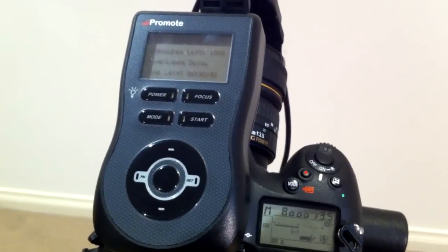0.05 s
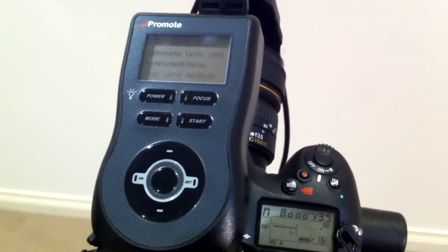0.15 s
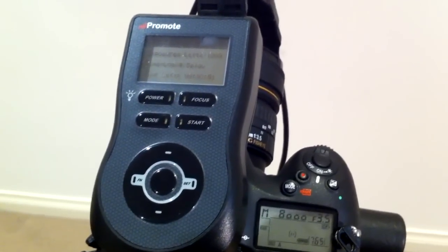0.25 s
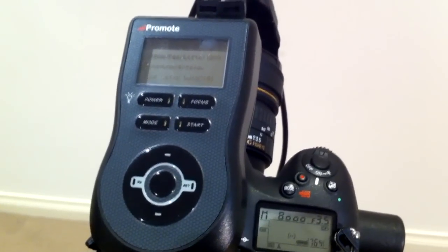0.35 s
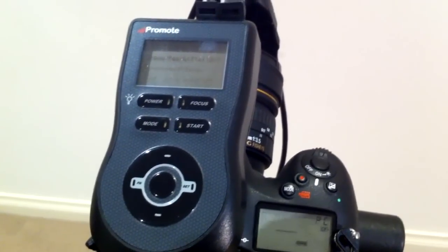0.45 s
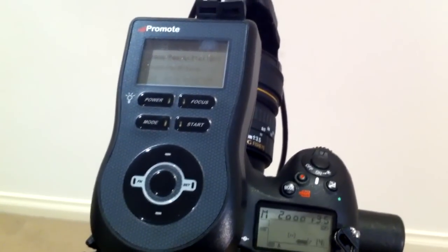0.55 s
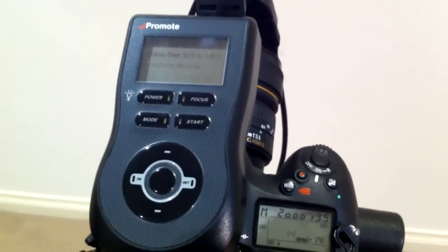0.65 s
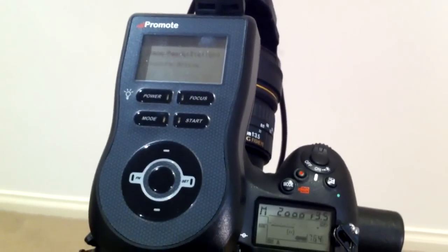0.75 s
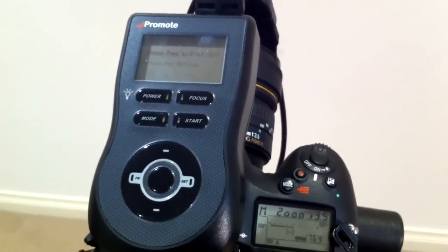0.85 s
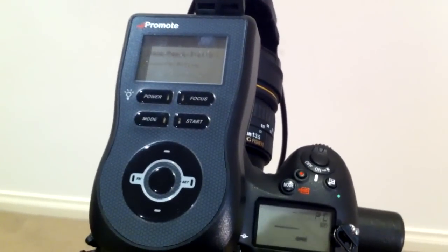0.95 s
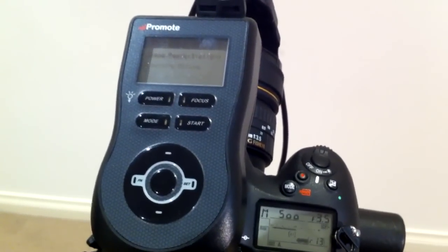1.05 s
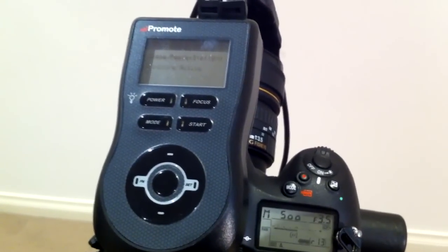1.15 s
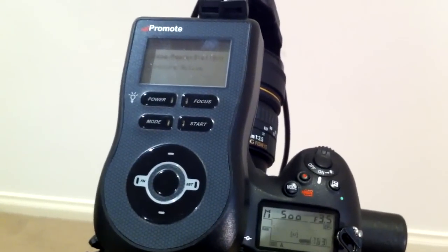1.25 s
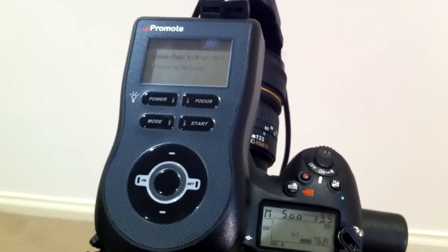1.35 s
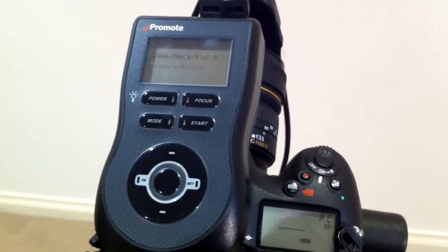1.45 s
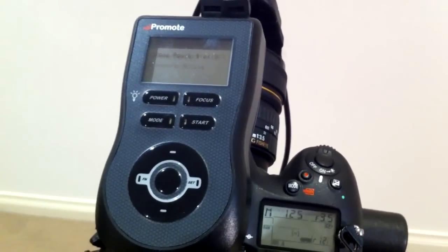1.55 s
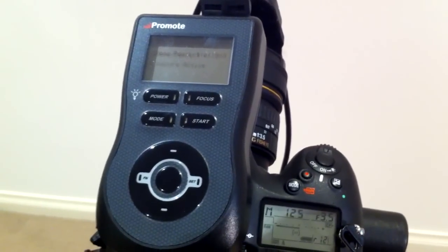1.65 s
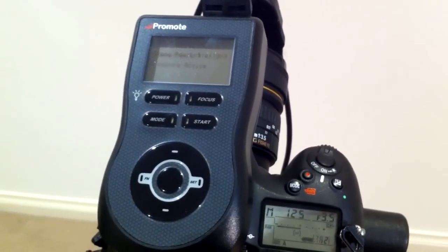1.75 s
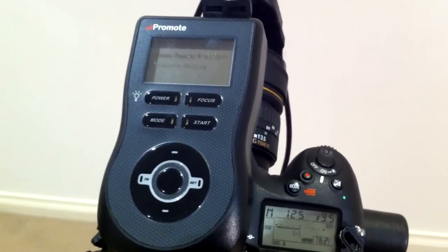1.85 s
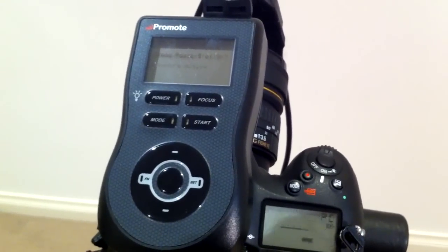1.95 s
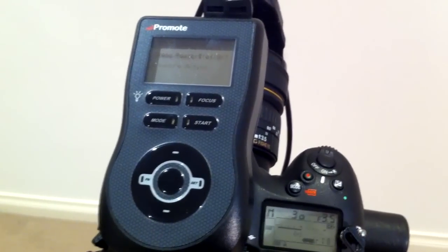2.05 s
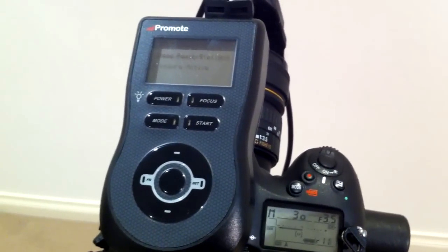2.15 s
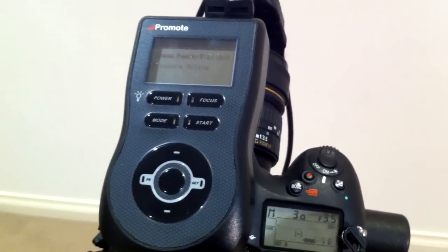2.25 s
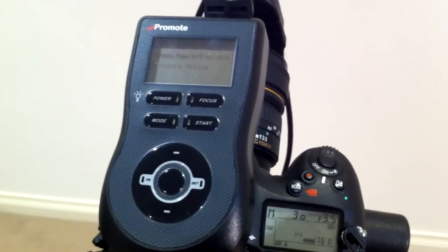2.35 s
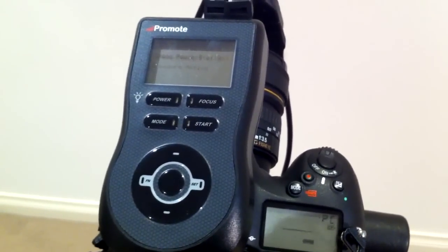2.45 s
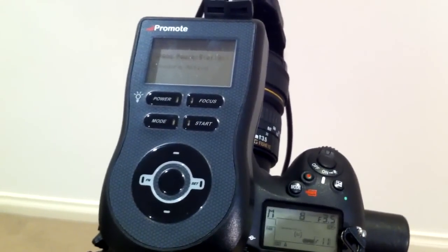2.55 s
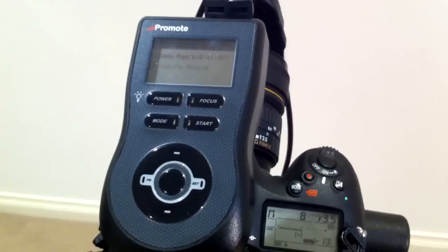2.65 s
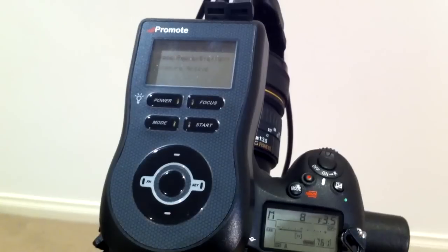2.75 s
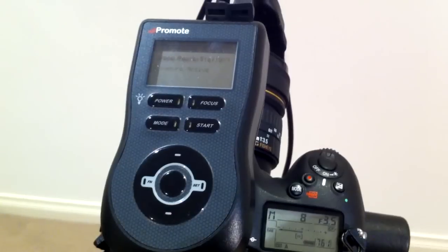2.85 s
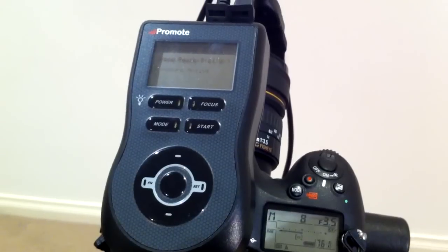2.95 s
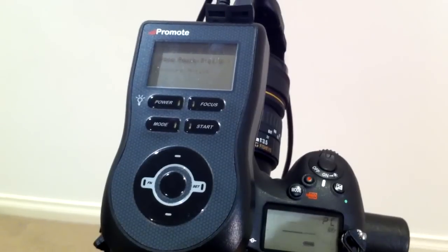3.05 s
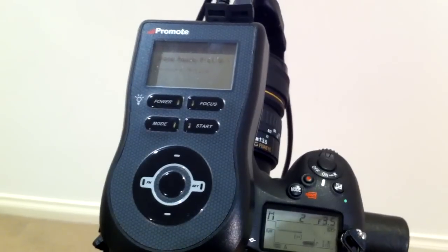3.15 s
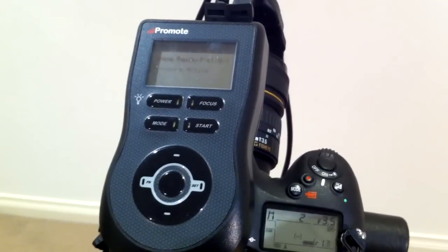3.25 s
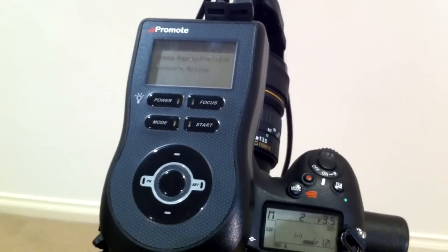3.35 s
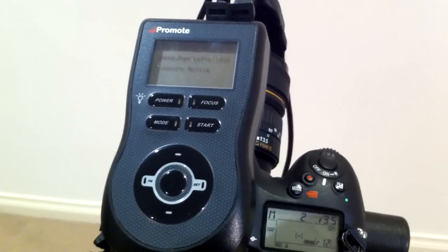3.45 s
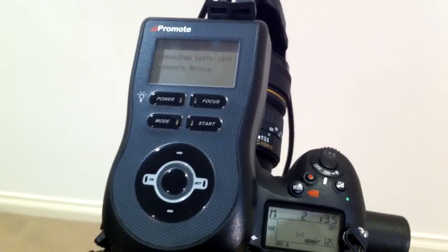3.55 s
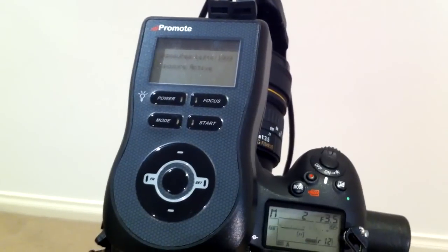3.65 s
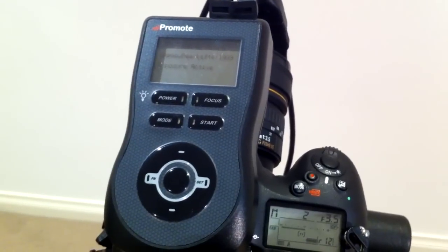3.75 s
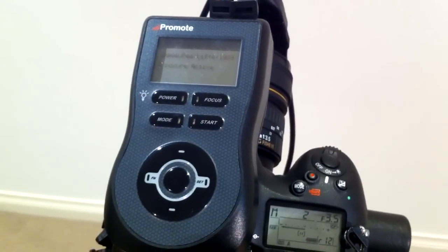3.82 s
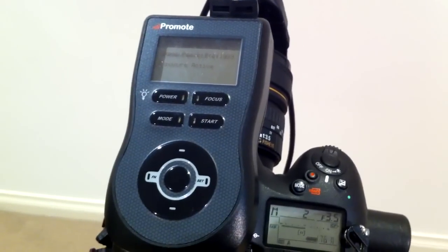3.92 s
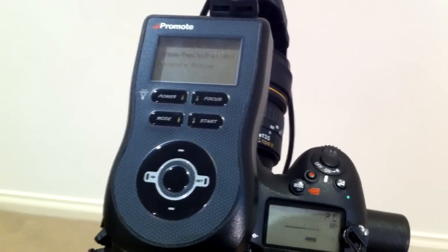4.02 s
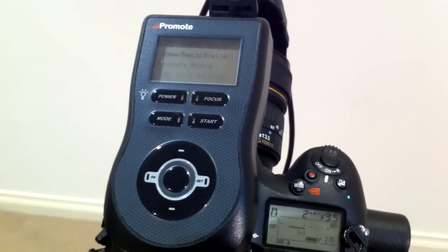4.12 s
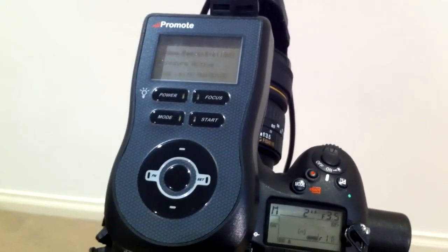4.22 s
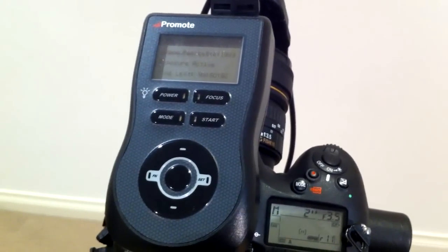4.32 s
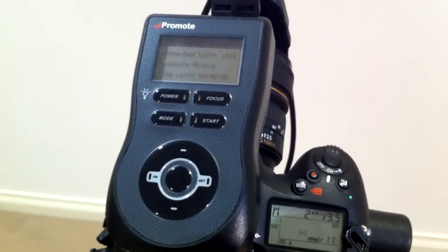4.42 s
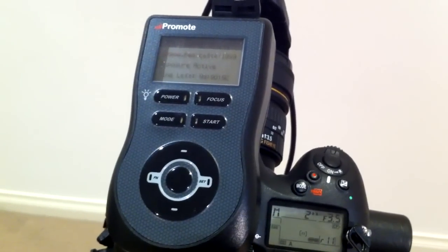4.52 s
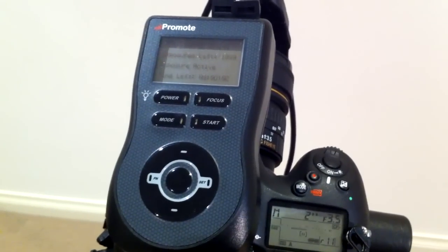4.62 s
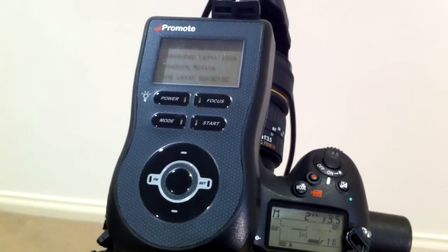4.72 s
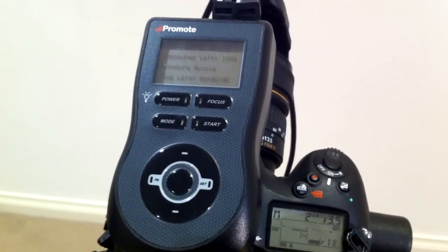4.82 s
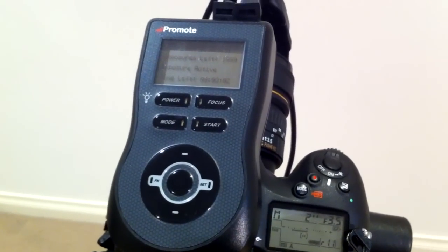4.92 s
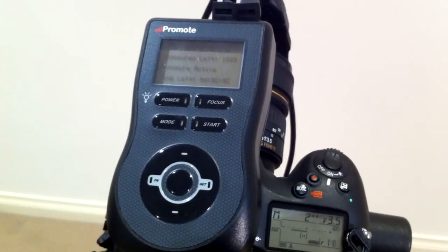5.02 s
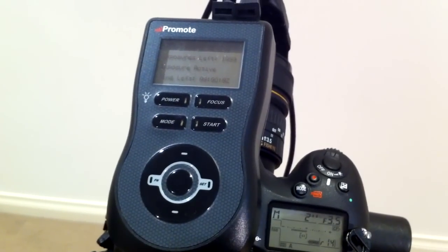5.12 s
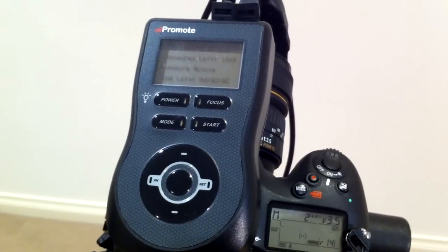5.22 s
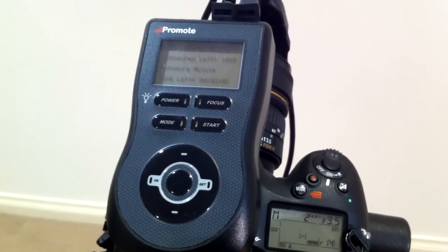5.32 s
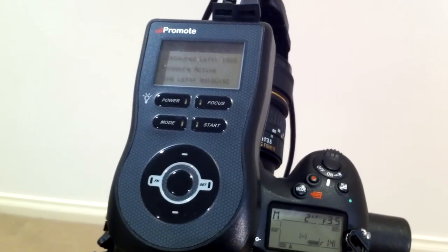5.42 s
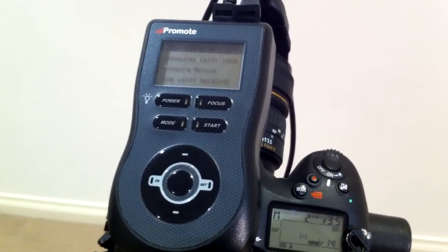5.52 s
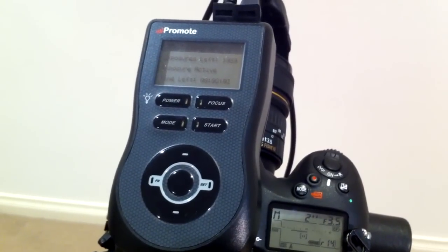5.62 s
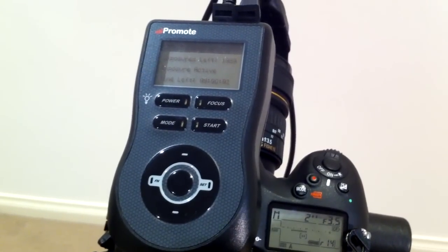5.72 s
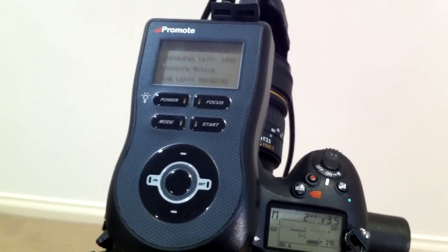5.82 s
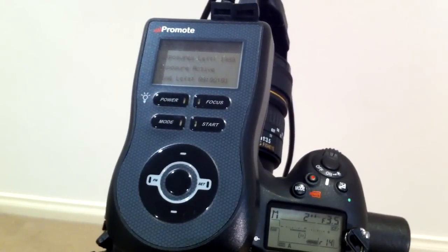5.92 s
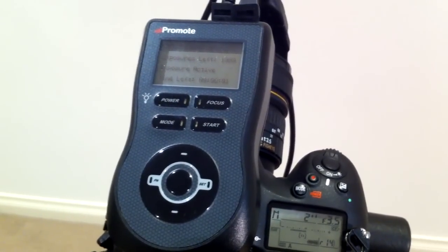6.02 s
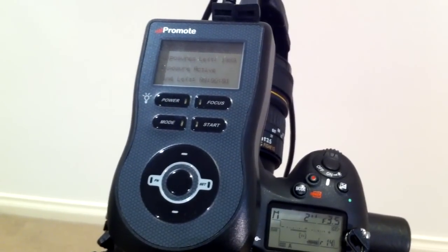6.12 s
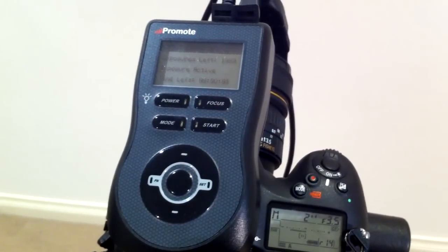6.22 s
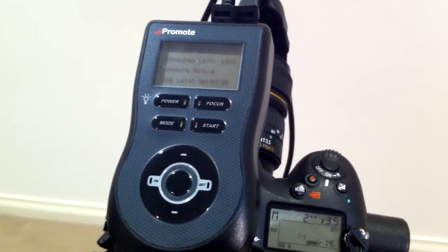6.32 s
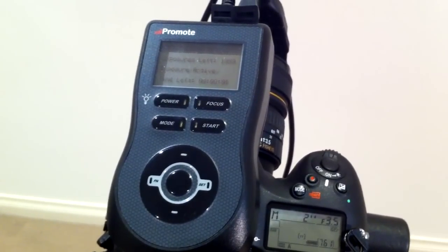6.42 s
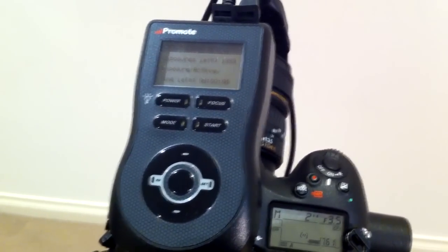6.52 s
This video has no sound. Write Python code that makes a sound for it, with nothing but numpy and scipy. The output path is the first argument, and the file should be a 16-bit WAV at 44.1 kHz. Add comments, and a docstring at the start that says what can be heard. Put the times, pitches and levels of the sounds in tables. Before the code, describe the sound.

A reflex camera close to the microphone in a small bare room fires eight exposures, roughly two a second. The first are single crisp clattering ka-chacks; later ones stretch into separate opening and closing clacks. The eighth opens, stays quiet for about two seconds, then snaps shut. Short bright reflections follow each, over soft hiss and faint low rustling.

```python
"""Small bare room: room tone and microphone hiss run throughout, with a low rustle that comes and goes. A
reflex camera on the floor fires eight exposures: the first three much alike, the later ones ever longer. Each
begins with a train of noise bursts (mirror up, first curtain), which set body and thin metal ringing. A second
train (second curtain, mirror down) closes it; the longer the exposure, the later it starts. The walls answer
every train with decaying noise; the microphone drops bass and the top of the treble."""
import sys
import numpy as np
from scipy import signal
from scipy.fft import rfft, irfft, next_fast_len
from scipy.io import wavfile

SR = 44100
rng = np.random.default_rng(int(sys.argv[2]) if len(sys.argv) > 2 else 0)


def to_wav(s):
    """Save 16-bit WAV."""
    ch = np.atleast_2d(s).T  # columns
    pcm = np.round(np.clip(ch, -1, 1) * 32767)  # PCM
    wavfile.write(sys.argv[1], SR, pcm.astype(np.int16))


N = 290114

# Spectrum of the room and microphone hiss, overall level set later: freq_hz, relative_db (per Hz)
HISS_SPECTRUM = [(26, -55), (45, -5.5), (149, -0.5), (275, -4), (311, -6.5), (438, -9.5), (573, -11),
                 (788, -13), (959, -14.5), (4590, -18), (15600, -21.5)]
# Level of the low rustle in the room tone, ahead of the microphone: time_s, level_db
RUSTLE_LEVEL = [(0, -75), (.5, -69), (1, -68.5), (1.5, -82), (2.9, -74), (3.8, -86), (4.2, -83),
                (4.35, -64), (4.68, -66), (4.92, -69.5), (5.3, -84), (6.58, -92)]
# Exposures: opens_s, closes_s
EXPOSURES = [(.1756, .2073), (.6762, .7077), (1.1777, 1.2107), (1.6812, 1.72), (2.1905, 2.2527),
             (2.6711, 2.8269), (3.2977, 3.8282), (4.1988, 6.228)]
# Blows of the mechanism, levels relative: train, delay_s, snap_db, tick_db, knock_db, dull_above_hz,
# loss_per_rebound_db (snap and tick), knock_loss_per_rebound_db
MECHANISM_BLOWS = [("opening", -.0002, -28.5, -28, -36, 8000, 8, 1),
                   ("opening", .0083, -40, -35, -37, 1300, 9, 6),
                   ("opening", .0124, -25, -28, -27, 1800, 10, 0),
                   ("opening", .0175, -37, -35, -24, 900, 1, 5),
                   ("opening", .0312, -33.5, -34, -24.5, 700, 10, 8),
                   ("opening", .0352, -31, -22, -30, 1100, 13, 5),
                   ("closing", -.0003, -34, -40, -28, 2500, 3, 10),
                   ("closing", .0036, -29.5, -32, -33, 3900, 13, 9),
                   ("closing", .0168, -41, -35, -42, 1500, 4, 0),
                   ("closing", .0311, -36, -29, -35, 4000, 8, 2),
                   ("closing", .0366, -34, -36, -23, 1400, 6, 5),
                   ("closing", .0396, -31, -31, -30.5, 2700, 6, 1),
                   ("closing", .0456, -33, -35, -30, 2000, 3, 1),
                   ("closing", .055, -38, -39, -26, 600, 2, 1),
                   ("closing", .0783, -33.5, -42, -37, 2500, 10, 5)]
# Colour of the snaps: freq_hz, relative_db (per Hz)
SNAP_COLOUR = [(600, -17), (1500, -2.5), (3000, 0.5), (5000, -0.5), (7000, -3.5), (9000, -3.5),
               (11000, -13.5), (15500, -13.5)]
# Colour of the shutter blades' ticks: freq_hz, relative_db (per Hz)
BLADE_COLOUR = [(6000, -58), (8500, -8), (10000, -5.5), (11600, -2.5), (13500, -6.5), (15500, -8)]
# Camera body resonances: pitch_hz, width_hz, opening_db, closing_db (relative)
BODY_MODES = [(355.5, 64.3, -5.5, -7.5), (464, 44, -6.5, -8), (509.3, 24, -9, -0.5), (785, 83, -2, -1),
              (948, 36, 0.5, 0.5), (1123, 117, 3, -4.5), (1602, 112, -0.5, 1), (1945, 88, 4.5, -0.5),
              (2356, 250, 1, -3), (2530, 19, -2, 7.5), (3154, 245, 0, 3), (3473, 92, 2, 1.5),
              (4300, 160, -15, 2.5)]
# Lightly damped metal parts: pitch_hz, level_db (before each slap's own level), t60_s
METAL_MODES = [(778, -57.5, .9), (2050, -58.5, .8)]
# Decay of the room by band: freq_hz, t60_s
ROOM_DECAY = [(250, 0.3), (660, 0.55), (1740, 0.5), (4600, 0.49), (8000, 0.49), (13000, 0.38)]
# Colour of the walls' answer: freq_hz, relative_db
WALL_COLOUR = [(200, 2.5), (700, -8.5), (2000, -4), (5000, -1.9), (9000, -4), (12000, -3), (15000, -6.5)]

BLOW_T60_S, KNOCK_T60_S = .01, .006
# each rebound of snap and tick comes after a longer gap and dies more slowly; knocks grow duller
REBOUND_S, GAP_GROWS, T60_GROWS, DULLS = .0023, 1.7, 1.3, .7
STIR_LEAD_S, STIR_DB, STIR_T60_S = .0033, -52.5, .06  # the release stirs just before each train
LEAD_IN_S = .01  # each train is computed from this long before its exposure time
SHELF_HZ, TOP_HZ = 15800, 16800  # deep treble cut starts; band limit
OFFSET = -.0001  # constant offset, full scale is 1


def amp(db):
    """dB to gain."""
    return 10 ** (np.asarray(db) / 20)


def unit(x):
    """x at rms 1."""
    return x / np.sqrt(np.mean(x ** 2) + 1e-20)


def along(points, hz):
    """Values of (Hz, value) points, interpolated on a log frequency axis."""
    f, v = np.transpose(points)
    return np.interp(np.log(hz + 1), np.log(f + 1), v)


def filtered(x, response):
    """x times a complex response of frequency."""
    m = next_fast_len(len(x) + SR // 4)
    return irfft(rfft(x, m) * response(np.fft.rfftfreq(m, 1 / SR)), m)[:len(x)]


def varied(habit, fresh):
    """Noise that keeps part of a habit and draws the share fresh anew."""
    fresh = np.clip(fresh, 0, 1)
    return np.sqrt(1 - fresh ** 2) * habit + fresh * rng.standard_normal(habit.shape)


def room_tone():
    """Hiss combed by a short echo in the microphone's housing, and a rustle in a low band."""
    def comb(f):
        return 1 + 0.16 * np.clip(f / 6000, 0, 1) * np.cos(2 * np.pi * f / 1900)

    hiss = unit(filtered(rng.standard_normal(N), lambda f: amp(along(HISS_SPECTRUM, f)) * comb(f)))
    rustle = unit(filtered(rng.standard_normal(N), lambda f: 1 / (1 + ((f - 310) / 60) ** 2)))
    time_s, level_db = np.transpose(RUSTLE_LEVEL)
    rustle_db = np.interp(np.arange(N) / SR, time_s, level_db)
    return amp(-66) * hiss + amp(rustle_db) * rustle


def contacts(name, count=4):
    """A train's stir, blows and rebounds: blow, delay_s, snap_db, tick_db, knock_db, dull_hz, t60_s."""
    blows = [row[1:] for row in MECHANISM_BLOWS if row[0] == name]
    rows = [(len(blows), -STIR_LEAD_S, STIR_DB, STIR_DB, STIR_DB - 8, 3000, STIR_T60_S)]
    for i, (delay, snap_db, tick_db, knock_db, dull_hz, loss_db, knock_loss_db) in enumerate(blows):
        for k in range(count):  # k = 0 is the blow itself
            later = REBOUND_S * sum(GAP_GROWS ** j for j in range(k))
            rows.append((i, delay + later, snap_db - k * loss_db, tick_db - k * loss_db,
                         knock_db - k * knock_loss_db, dull_hz * DULLS ** k, BLOW_T60_S * T60_GROWS ** k))
    return rows


def train(touches, noise):
    """The contacts as fast-rising, decaying noise in three rows: snaps, blade ticks and dull knocks."""
    t = np.arange(noise.shape[-1]) / SR - LEAD_IN_S
    rows = np.zeros((len(noise[0]), len(t)))
    for blow, delay, snap_db, tick_db, knock_db, dull_hz, t60 in touches:
        snap_noise, tick_noise, knock_noise = noise[blow]
        since = np.maximum(t - delay, 0)
        rise = 1 - np.exp(-(since / .0004) ** 2)
        rows[0] += rise * amp(snap_db - 60 * since / t60) * snap_noise
        rows[1] += rise * amp(tick_db - 60 * since / t60) * tick_noise
        knock = rise * amp(knock_db - 60 * since / KNOCK_T60_S) * knock_noise
        pole = np.exp(-2 * np.pi * dull_hz / SR)  # two equal one-pole lowpasses in a row
        rows[2] += signal.lfilter([(1 - pole) ** 2], [1, -2 * pole, pole ** 2], knock)
    return rows


def body(column):
    """The causal response of the body: damped resonances of alternating sign."""
    def response(f):
        total = 0
        for k, row in enumerate(BODY_MODES):
            pitch, width = row[:2]
            mode = 1j * f * width / (pitch ** 2 - f * f + 1j * f * width)
            total = total + (-1) ** k * amp(row[column]) * mode
        return total
    return response


def room(blows, noise):
    """Bare walls scatter blow energy into noise that builds up in a few ms and dies at each band's speed."""
    padding = noise.shape[1] - blows.shape[1]
    hz, t, z = signal.stft(np.pad(blows, ((0, 0), (0, padding))), SR, nperseg=128)
    loss_db = 60 * t / along(ROOM_DECAY, hz)[:, None]
    decay = amp(along(WALL_COLOUR, hz)[:, None] - loss_db) ** 2
    decay = decay * (1 + amp(3.5 - 60 * t / 0.3) ** 2)  # extra from floor and near wall, fading sooner
    decay = decay * (1 - np.exp(-np.maximum(t - .004, 0) / 0.002)) * t[1]
    energy = np.abs(signal.fftconvolve(np.abs(z) ** 2, decay[None], axes=2)[..., :len(t)])
    grain = signal.stft(noise, SR, nperseg=128)[2]
    scattered = np.sqrt(energy) * grain / np.std(grain)
    return signal.istft(scattered, SR, nperseg=128)[1][:, :noise.shape[1]]


def shutter():
    """The mechanism repeats closely, so exposures share much noise detail; each train echoes in the room."""
    out, size = np.zeros(N + SR), SR // 2 + SR // 5
    for k, name in enumerate(("opening", "closing")):
        touches = contacts(name)
        habit = rng.standard_normal((len(MECHANISM_BLOWS), 3, SR // 7))
        walls = rng.standard_normal((3, size))
        heard = np.zeros((3, N + SR))
        for exposure in EXPOSURES:
            blows = train(touches, varied(habit, .6))
            start = round((exposure[k] - LEAD_IN_S) * SR)
            heard[:, start:start + blows.shape[1]] += blows
            heard[:, start:start + size] += amp(15) * room(blows, varied(walls, 0.68))
        snaps, ticks, knocks = heard
        out += filtered(snaps, lambda f: amp(9.5 + along(SNAP_COLOUR, f)))
        out += filtered(ticks, lambda f: amp(10 + along(BLADE_COLOUR, f)))
        out += amp(23.5) * filtered(knocks, body(column=2 + k))
    return out[:N]


def metal():
    """The mirror's slap at either end of its swing sets thin metal ringing as decaying sines."""
    out, t = np.zeros(N + 2 * SR), np.arange(SR) / SR
    swell = 1 - np.exp(-t / 0.0073)
    for opens, closes in EXPOSURES:
        for slap_s, slap_db in ((opens + 0.011, -1.5), (closes + .038, 0)):
            ring = np.zeros(SR)
            for hz, level, t60 in METAL_MODES:
                ring_db = level + slap_db + rng.normal(0, 0.21) - 60 * t / t60
                ring += amp(ring_db) * np.sin(2 * np.pi * hz * t)
            out[round(slap_s * SR):][:SR] += ring * swell
    return out[:N]


def scene():
    """The camera in its room over the room tone."""
    return (room_tone() + shutter() + metal())[None]


def record(dry):
    """The microphone drops the bass; the top treble is cut deeply, with nothing above the band limit."""
    def bass(f):
        return (1j * f / (1j * f + 200)) ** 2

    def top(f):
        return np.where(f < SHELF_HZ, 1, amp(-38)) * (f < TOP_HZ)

    return OFFSET + filtered(dry[0], lambda f: bass(f) * top(f))[None]


dry = scene()
out = record(dry)
to_wav(out)
```